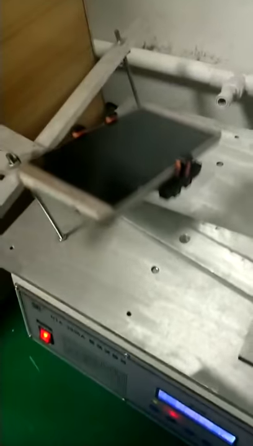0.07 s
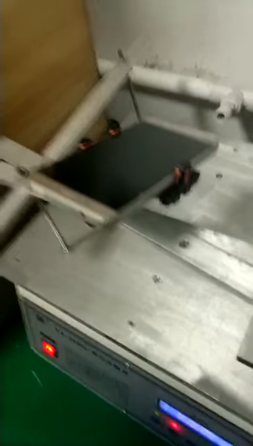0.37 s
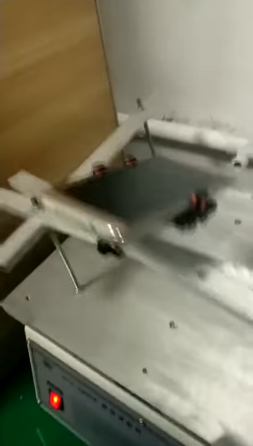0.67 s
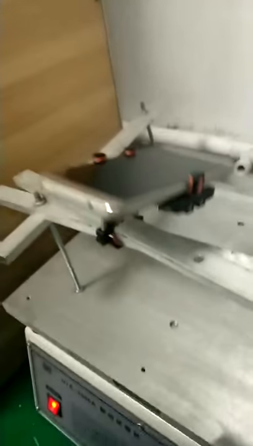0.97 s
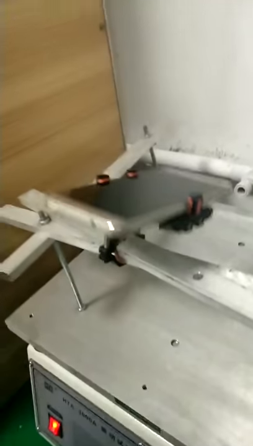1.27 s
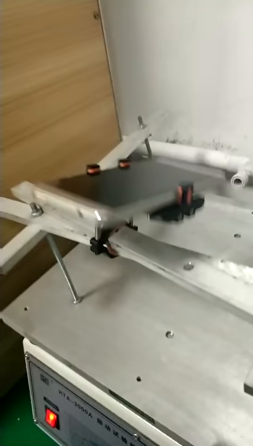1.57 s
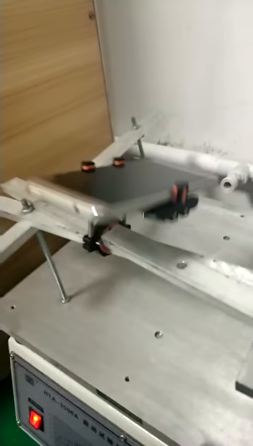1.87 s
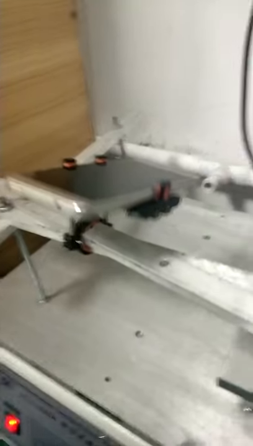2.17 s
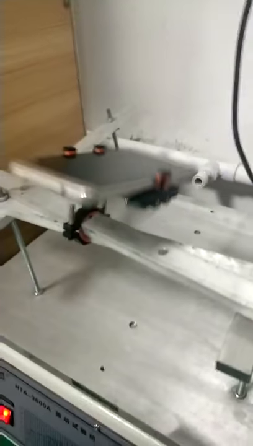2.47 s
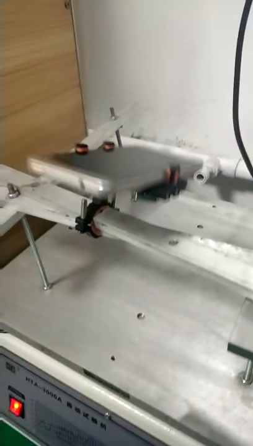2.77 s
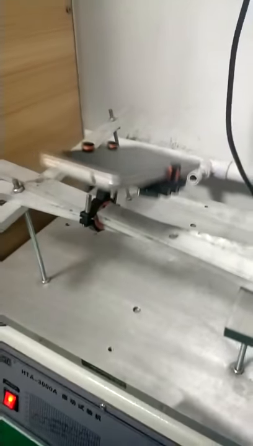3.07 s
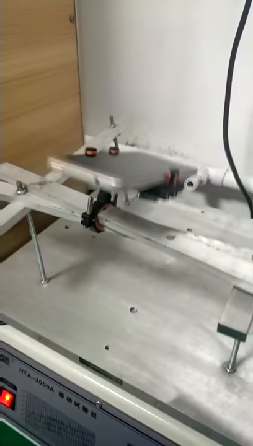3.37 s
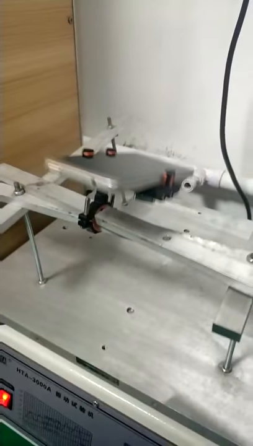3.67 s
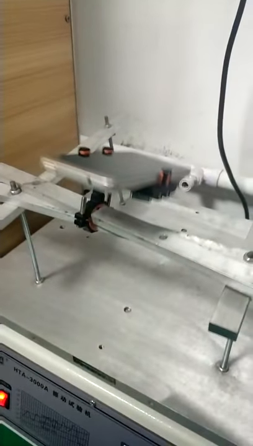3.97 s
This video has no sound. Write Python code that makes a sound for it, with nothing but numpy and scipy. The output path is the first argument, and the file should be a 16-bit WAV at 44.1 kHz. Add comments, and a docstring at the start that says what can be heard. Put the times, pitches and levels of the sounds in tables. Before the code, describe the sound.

A vibration table buzzes loudly and without a break as it shakes a clamped tablet, while loose bolts and clamps chatter brightly. The tone shifts slightly as the close microphone drifts over it in a small, hard-walled room.

```python
"""A hard mains buzz with bright metallic chatter on top: an electromagnetic vibration table is shaking
a clamped tablet in a small hard-walled room. The clamps knock four times a stroke, making the steel
plate buzz and rattle, and now and then ring at their own pitch. Loose bolts tap out the chatter.
The microphone drifts over the table, so one plate resonance after another comes forward."""
import sys
import numpy as np
from scipy import signal
from scipy.fft import rfft, irfft
from scipy.io import wavfile
from scipy.ndimage import uniform_filter1d, map_coordinates

SR = 44100
rng = np.random.default_rng(int(sys.argv[2]) if len(sys.argv) > 2 else 0)


def master_out(mix):
    """Clip the mix to full scale and print it as 16-bit PCM to the path in sys.argv[1]."""
    frames = np.transpose(np.atleast_2d(mix))
    ceiling = np.clip(frames, -1, 1)
    pcm = np.round(ceiling * 32767).astype(np.int16)
    wavfile.write(sys.argv[1], SR, pcm)


N = 176400
SHAKE_HZ = 49.962
HARDEST_HIT_S = 0.0017  # where in the stroke loose parts hit hardest

# the clamps' knocks within one stroke: delay_ms, relative_db
STROKE_KNOCKS = [(4.2, 4), (8.2, 0.5), (12.6, 0), (16.8, 5.5)]
# partials of the plate's buzz: harmonic_number, relative_db
BUZZ_PARTIALS = [(3, -31), (4, -9.5), (5, -28.5), (6, -36.5), (7, -33.5), (8, -23.5), (9, -20), (10, -14),
                 (11, -17.5), (12, -3.5), (13, -.5), (14, -15.5), (15, -4), (16, -4.5), (17, -13),
                 (18, -8.5), (19, -14), (20, -9), (21, -8.5), (22, 1), (23, -2.0), (24, -20.5), (25, -1.0),
                 (26, -1), (27, -2.5), (28, 1), (29, -10.5), (30, -3), (31, -15), (32, -8), (33, -6.5),
                 (34, -8.0), (35, -9.5), (36, -9.5), (37, -10), (38, -13), (39, -10), (40, -4), (41, -7.5),
                 (42, -8), (43, -9), (44, -8), (45, -17), (46, -8.5), (47, -1), (48, -13.5), (49, -9.5),
                 (50, -6.5), (51, -11), (52, -2.5), (53, -13.5), (54, -17), (55, -11.5), (56, -7.5),
                 (57, -10.5), (58, -10), (59, -10.5), (60, -22.5), (61, -16), (62, -16), (63, -20.5),
                 (64, -44), (65, -17), (66, -16), (67, -17.5)]


def plate_buzz(knock_times, accent_db, gain_db=-27.5, wander_per_khz=0.3, wander_hz=1.38, tremble_hz=18):
    """The knocked plate buzzes in harmonics of the shake rate, which wander as the microphone moves."""
    # plate resonances that come forward or recede: centre_s, half_length_s, pitch_hz, half_width_hz, boost_db
    resonances = [(2.2, 1, 550, 10, -39), (3.61, 0.35, 600, 32, -15), (0.76, 0.2, 668, 24, 11),
                  (1.34, .22, 650, 21, -8), (2.87, 0.15, 650, 40, -12), (3.9, 0.62, 650, 25, 7.5),
                  (3.72, 0.3, 750, 18, -11), (1.65, 0.49, 847, 47, -23), (3.92, 0.083, 820, 53, -8),
                  (0.082, 0.3, 980, 97, 5.5), (2, 0.81, 1000, 25, -20), (3.88, 0.15, 1000, 22, 19.5),
                  (3.23, 1, 1134, 130, -5.5), (3.9, 0.16, 1030, 190, -11), (.745, 0.035, 1300, 210, -10),
                  (0.99, 0.75, 1300, 8.3, -17), (3.46, 0.38, 1300, 9.3, 6.5), (0.32, 0.54, 1350, 29, -2),
                  (0.52, .3, 1400, 30, 3), (1.66, .3, 1440, 40, -32), (3.48, 0.16, 1400, 29, -15),
                  (1.86, 0.43, 1500, 25, 9.5), (2.35, 0.22, 1500, 23, -7), (2.7, 0.23, 1725, 37, 3),
                  (2.75, 0.2, 1770, 170, -12.5), (0.91, 0.27, 1940, 120, 8.5), (2.1, 0.75, 2010, 15, 14),
                  (3.1, 0.58, 2110, 90, -19.5), (.75, 0.22, 2350, 23, 7), (1.32, 0.32, 2350, 30, -7),
                  (2.43, .2, 2300, 50, 10), (2.3, 0.094, 2400, 39, 12), (3.66, 0.85, 2350, 24, -7),
                  (1.11, 0.28, 2600, 35, 10), (2.35, .15, 2780, 33, -7), (4, 0.31, 2750, 96, -3.5)]
    t, starts = np.arange(N) / SR, stroke_starts()
    fundamental = np.exp(2j * np.pi * SHAKE_HZ * t)
    unevenness = rms_one(np.interp(t, knock_times.ravel(), from_db(accent_db).ravel())) - 1
    wave, out = fundamental ** (BUZZ_PARTIALS[0][0] - 1), 0
    for (harmonic, db), phase in zip(BUZZ_PARTIALS, buzz_phases()):
        wave = wave * fundamental  # one harmonic up
        hz = harmonic * SHAKE_HZ
        khz = hz / 1000
        boost_db = sum(boost * swell(starts, centre_s, half_s) * swell(hz, pitch_hz, half_hz)
                       for centre_s, half_s, pitch_hz, half_hz, boost in resonances)
        # real parts move the level, imaginary parts the phase
        wander = wander_per_khz * khz * (.5 * drift(wander_hz * 2, starts) + 1.5j * drift(wander_hz, starts))
        tremble = .1 * np.sqrt(khz) * (drift(tremble_hz, starts) + 1j * drift(tremble_hz, starts))
        gain = from_db(db) * rms_one(from_db(boost_db) * np.exp(wander + 1j * phase) * (1 + tremble))
        roughness = np.interp(hz, [550, 1170], [0, 1])  # uneven knocks roughen the upper partials
        out = out + (np.interp(t, starts, gain) * wave).real * (1 + roughness * unevenness)
    return from_db(gain_db) * out


def buzz_phases(travel_ms_at_1khz=0.596, scatter_rad=0.321):
    """Knocks travel through the plate, low waves more slowly, and its ringing fills the gaps."""
    harmonics, db = np.transpose(BUZZ_PARTIALS)
    delay_ms, knock_db = np.transpose(STROKE_KNOCKS)
    bins, khz = harmonics.astype(int), harmonics * SHAKE_HZ / 1000
    knock_spectrum = np.exp(-2j * np.pi * np.outer(khz, delay_ms)) @ from_db(knock_db)
    bending_lag = 4 * np.pi * travel_ms_at_1khz * np.sqrt(khz)
    phase = np.angle(knock_spectrum) - bending_lag + scatter_rad * rng.standard_normal(len(bins))
    spectrum = np.zeros(256, complex)
    for _ in range(4):  # even out the level across the stroke
        spectrum[bins] = from_db(db) * np.exp(1j * phase)
        even_stroke = np.exp(1j * np.angle(np.fft.ifft(spectrum)))
        phase = np.angle(np.fft.fft(even_stroke))[bins]
    return phase


def clamp_knocks(vary_db=2.5):
    """The clamps never knock twice alike: times and random accents, one row per stroke."""
    times = stroke_starts()[:, None] + np.transpose(STROKE_KNOCKS)[0] / 1000
    return times, vary_db * rng.uniform(-1.03, 1, times.shape)


def bolt_chatter(bolts=22, gain_db=1.5, burst_db=5, vary_db=4, creep_s=50e-6, jitter_s=14e-6):
    """Loose bolts each tap once a stroke, slightly out of time, and ring into the room."""
    # bright tone of the bolts: frequency_hz, relative_db
    bolt_spectrum = [(2000, -69), (3000, -9), (3300, -14.5), (3800, -19), (4100, -8), (4500, -14.5),
                     (4900, -16), (5300, -11.5), (5500, -14.5), (5700, -10), (6500, -9), (7100, -4.5),
                     (7800, 0), (9300, -1), (10600, -3.5), (11200, 1), (11800, -4.5), (12800, -1),
                     (13600, -8.5)]
    # level ride of the chatter: time_s, relative_db
    ride = [(0.03, -17.5), (3.05, -17), (3.85, -17)]
    t, starts, out = np.arange(N) / SR, stroke_starts(), 0
    for place in (np.arange(bolts) + rng.random(bolts)) / bolts:  # fraction of a stroke
        times = starts + place / SHAKE_HZ + creep_s * drift(4, starts)
        times += jitter_s * rng.standard_normal(len(starts))
        burst = np.cos(np.pi * (place - HARDEST_HIT_S * SHAKE_HZ)) ** 2
        tap_db = burst_db * burst + vary_db * np.clip(rng.standard_normal(len(starts)), -2, 2)
        bolt_ring = dense_ring(t60_s=0.018)
        room_tail = from_db(0.5) * dense_ring(t60_s=0.15)
        out = out + signal.oaconvolve(clicks(times, from_db(tap_db)), bolt_ring + room_tail)[:N]
    level_db = gain_db + np.interp(t, *np.transpose(ride))
    return from_db(level_db) * colour(through_plate(out), bolt_spectrum)


def through_plate(taps, spots=7, top_hz=8800, moves_per_s=1.505):
    """Below top_hz the plate colours the taps, differently at each spot the microphone passes."""
    low = signal.sosfiltfilt(signal.butter(2, top_hz, fs=SR, output="sos"), taps)
    mic_position = np.minimum(np.arange(N) / SR * moves_per_s, spots - 1)
    out = taps - low
    for spot in range(spots):
        nearness = np.cos(np.pi / 2 * np.clip(mic_position - spot, -1, 1))
        out = out + nearness * signal.oaconvolve(low, plate_ring())[:N]
    return out


def plate_ring():
    """The plate's ring at one spot: narrow peaks and notches, with no broad region standing out."""
    modes = rfft(dense_ring(t60_s=0.056), SR)
    broad_shape = np.sqrt(uniform_filter1d(np.abs(modes) ** 2, size=250))
    return irfft(modes / broad_shape, SR)[:SR // 8]


def plate_rattle(knock_times, accent_db, decay_s=0.0024, steady_scuff=0.42):
    """Each knock scuffs the plate with a short rough burst, over a bed of steady scuffing."""
    # tone of the scuffing: frequency_hz, relative_db
    scuff_spectrum = [(30, -61), (80, -47), (130, -26.5), (175, -17.5), (215, -9), (280, -22), (420, -20.5),
                      (540, -13.5), (660, 0), (730, -5.5), (950, -5.5), (1150, -3), (1400, 0), (1800, -0.5),
                      (2050, -.5), (2600, 3), (3100, -4), (4200, -10.5), (8000, -18)]
    # level ride of the rattle: time_s, level_db
    ride = [(.1, -25), (.6, -24.5), (1.7, -24.5), (2.25, -24.5), (2.65, -25.5), (3.8, -26.5)]
    hits = clicks(knock_times, from_db(np.transpose(STROKE_KNOCKS)[1] + accent_db))
    force = rms_one(signal.lfilter([1], [1, -np.exp(-1 / (decay_s * SR))], hits))
    scuff = (force + steady_scuff) * rng.standard_normal(N)
    level_db = np.interp(np.arange(N) / SR, *np.transpose(ride))
    return from_db(level_db) * colour(scuff, scuff_spectrum)


def clamp_rings(decay_s=0.006):
    """A loose clamp, hit once a stroke, rings at its own pitch, partly clean and partly rough."""
    # spells of ringing: centre_s, half_length_s, pitch_hz, width_hz, level_db, clean_share
    spells = [(1.262, 0.39, 11300, 277.8, -28.5, 0.04), (2.007, 0.24, 8200, 185.2, -27.5, 0.2),
              (2.756, 0.19, 9850, 305.6, -42, .1), (2.85, .4, 11500, 250, -28.5, 0.2),
              (3.637, 0.57, 7580, 350, -26, 0), (2.94, 1, 5770, 147, -37, 0),
              (3.2, 0.77, 4230, 350, -38.5, 0.3), (1.6, 0.63, 3296, 300, -39, 0.3),
              (3.14, .15, 2620, 200, -28.5, 0.73), (3.456, 0.32, 2630, 240, -26.5, 0.68),
              (3.92, 0.2, 2600, 199, -25, 0.86)]
    t, out = np.arange(N) / SR, 0
    since_hit = (t - HARDEST_HIT_S) % (1 / SHAKE_HZ)
    decay = np.exp(-since_hit / decay_s)
    for centre_s, half_s, hz, width_hz, db, clean in spells:
        band = signal.butter(2, [hz - width_hz / 2, hz + width_hz / 2], "band", fs=SR, output="sos")
        rough = rms_one(signal.sosfilt(band, decay * rng.standard_normal(N)))
        low_cut = signal.butter(2, hz / 2, "high", fs=SR, output="sos")
        tone = rms_one(signal.sosfilt(low_cut, decay * np.sin(2 * np.pi * hz * since_hit)))
        ring = np.sqrt(clean) * tone + np.sqrt(1 - clean) * rough
        out = out + from_db(db) * swell(t, centre_s, half_s) * ring
    return out


def stroke_starts():
    """Start of each stroke of the table, in seconds."""
    return np.arange(-1, N / SR * SHAKE_HZ + 1) / SHAKE_HZ


def dense_ring(t60_s):
    """Countless close modes dying together; unit energy."""
    t = np.arange(SR // 4) / SR
    ring = rng.standard_normal(len(t)) * from_db(-60 * t / t60_s)
    return ring / np.linalg.norm(ring)


def clicks(times, sizes):
    """A train of impulses."""
    out = np.zeros(N)
    inside = (times >= 0) & (times < (N - 1) / SR)
    np.add.at(out, np.round(times[inside] * SR).astype(int), sizes[inside])
    return out


def colour(x, spectrum):
    """Give a sound the tone of a body, drawn on a log-frequency axis; unit power."""
    hz, db = np.transpose(spectrum)
    bin_hz = np.maximum(np.arange(N // 2 + 1) * SR / N, 1)
    eq_db = np.interp(np.log(bin_hz), np.log(hz), db)
    return rms_one(irfft(rfft(x) * from_db(eq_db), N))


def drift(rate_hz, t):
    """Smooth random motion with a spread of about 1."""
    knots = rng.standard_normal(512)
    return map_coordinates(knots, [np.abs(t * rate_hz) + 2], order=3, mode="mirror")


def swell(x, centre, half_width):
    """A bell-shaped rise and fall."""
    return np.exp(-((x - centre) / half_width) ** 2)


def from_db(db):
    """Decibels to gain."""
    return 10 ** (np.asarray(db) / 20)


def rms_one(x):
    """Scale to unit power."""
    return x / np.sqrt(np.mean(np.abs(x) ** 2) + 1e-20)


def scene():
    """Buzz, rattle, chatter and ringing clamps at one microphone."""
    times, accent_db = clamp_knocks()
    plate = plate_buzz(times, accent_db) + plate_rattle(times, accent_db)
    return (plate + bolt_chatter() + clamp_rings())[None]


def record(dry):
    """The highest peaks are rounded, the top is cut steeply and the sound breaks off at the end."""
    peak_limit, cutoff_hz, stop_s, fade_s = .75, 13900, 3.972, 0.0042
    rounded = dry / (1 + (dry / peak_limit) ** 6) ** (1 / 6)
    fade = np.exp(-np.maximum(np.arange(N) / SR - stop_s, 0) / fade_s)
    high_cut = signal.ellip(12, .1, 80, cutoff_hz, fs=SR, output="sos")
    return signal.sosfilt(high_cut, rounded * fade)


dry = scene()
out = record(dry)
master_out(out)
```